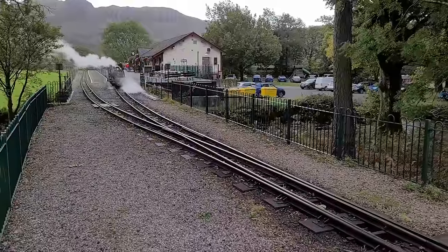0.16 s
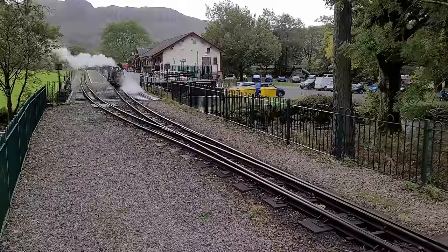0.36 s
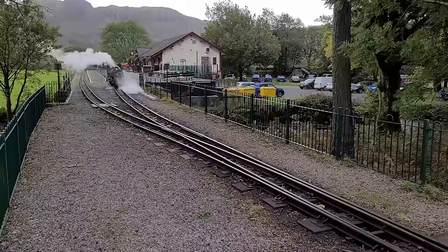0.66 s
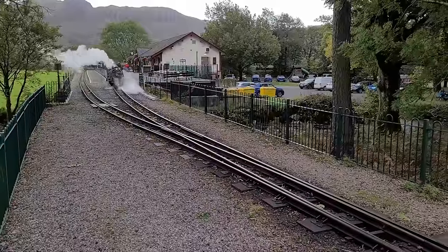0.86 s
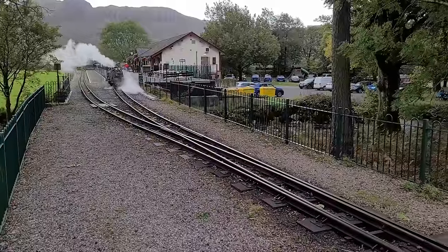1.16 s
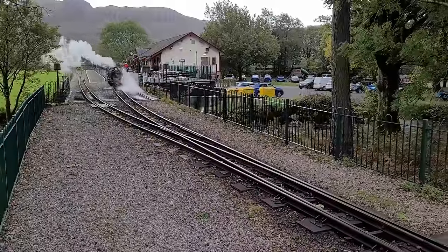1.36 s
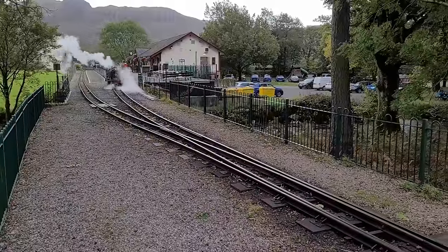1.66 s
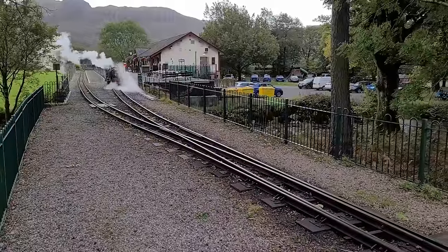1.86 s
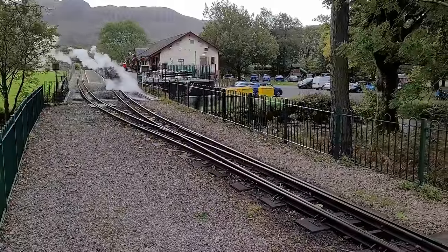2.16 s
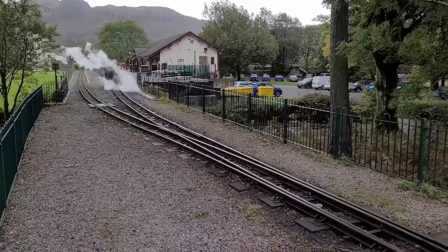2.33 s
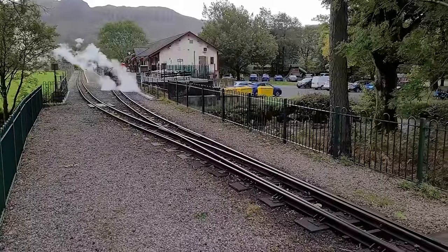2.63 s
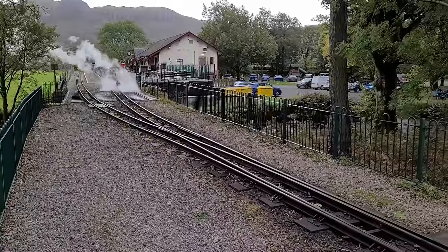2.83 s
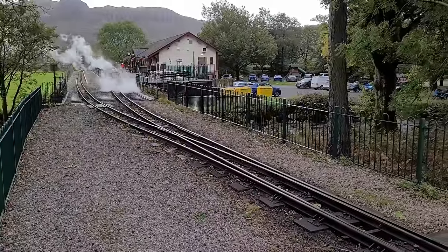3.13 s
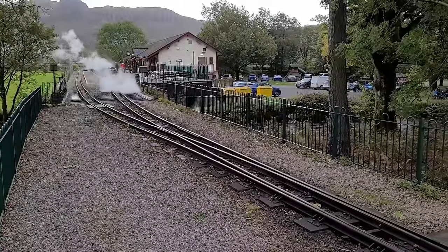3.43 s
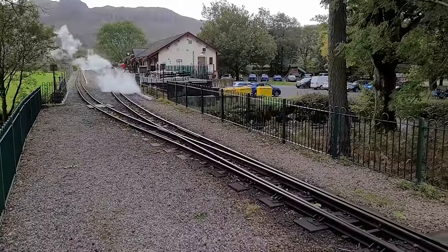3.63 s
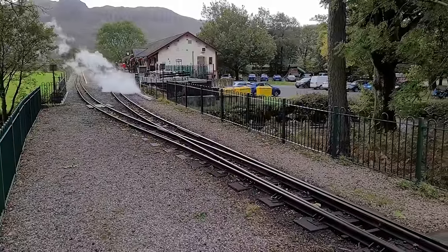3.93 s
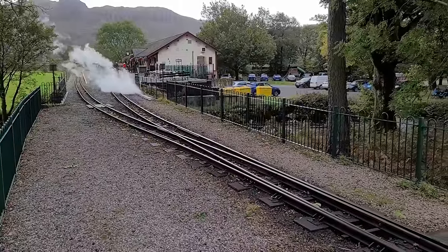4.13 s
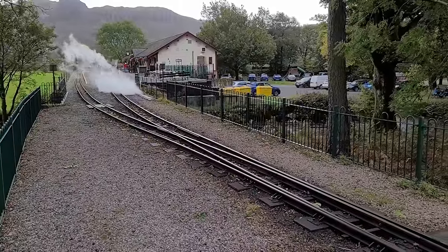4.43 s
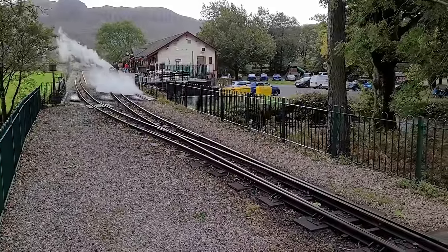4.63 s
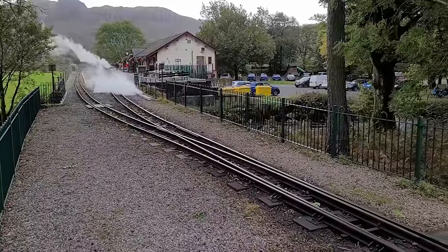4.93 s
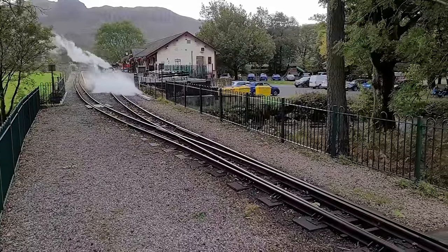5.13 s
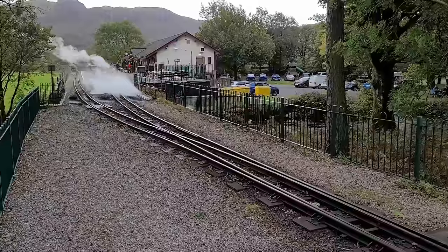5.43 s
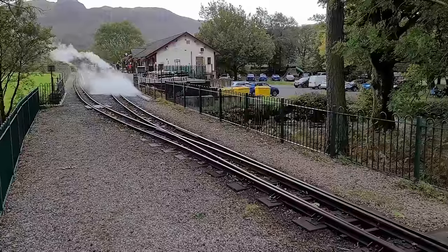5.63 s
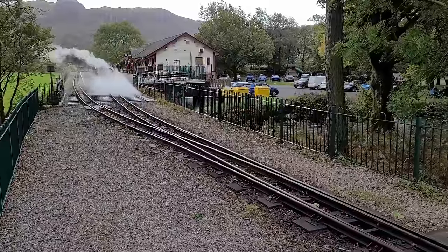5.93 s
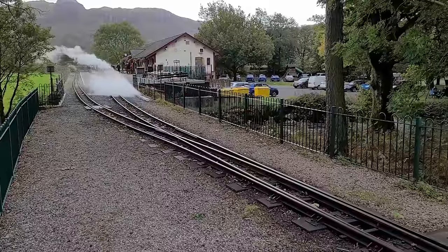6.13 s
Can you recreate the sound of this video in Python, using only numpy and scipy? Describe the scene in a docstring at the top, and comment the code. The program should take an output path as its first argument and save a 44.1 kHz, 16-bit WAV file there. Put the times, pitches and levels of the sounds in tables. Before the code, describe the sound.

Steam jets from a small locomotive, swelling from faint sputtering to a bright continuous roar, with low buffeting breeze over the open-air microphone.

```python
"""A miniature steam locomotive some way off at a country station blows steam from its open cylinder cocks.
The hiss is resonant jet noise that builds in steps, surges brightly, then spreads into a wide, steady rush.
Below it the plume roars as low-passed jet noise and the engine's hollow parts ring as resonant noise.
Delayed copies of the jet noise give it a fine, slowly moving comb colour. A breeze of lumpy low noise buffets
both microphone ports, single eddies strike as short pressure swings, and faint outdoor air lies beneath."""
import sys
import numpy as np
from scipy import signal
from scipy.fft import rfft, irfft, next_fast_len
from scipy.io import wavfile
from scipy.ndimage import map_coordinates

SR = 44100
rng = np.random.default_rng(int(sys.argv[2]) if len(sys.argv) > 2 else 0)


def waveform_to_disk(signal):
    """Save audio, clipped to [-1, 1], as 16-bit WAV at the path in sys.argv[1]."""
    frames = np.transpose(np.atleast_2d(signal))
    scaled = np.clip(frames, -1, 1) * 32767
    samples = np.round(scaled).astype(np.int16)
    wavfile.write(sys.argv[1], SR, samples)


N = 276948

# Steam flow through the cocks, opened in steps. Each row: time in seconds, hiss level in dB before trim.
STEAM_FLOW = [(0, -56.5), (.14, -50.5), (.42, -49.5), (.88, -45.5), (1.03, -47.5), (1.36, -45.5),
              (1.42, -43.5), (1.53, -41), (1.75, -39.5), (2.0, -40), (2.16, -41.5), (2.46, -37.5),
              (2.52, -41), (2.69, -39), (2.78, -37), (2.9, -34), (2.98, -36), (3.1, -32), (3.26, -35),
              (3.7, -35), (4.9, -35.5), (6.28, -34)]
# Brief dips of the steam. Each row: time in seconds, change at the deepest point in dB.
FLOW_DIPS = [(1.13, -3.5), (5.465, -3)]
# Hiss of the cocks before its low cut. Each row: frequency in Hz, relative density in dB per Hz.
JET_SPECTRUM = [(1100, -12), (2500, -2), (3300, -3), (4600, -2.5), (6400, 2), (7100, -0.5), (7700, 1.5),
                (9100, -5), (10300, -4.5), (10900, -12), (11600, -7), (13200, -8), (14700, -4),
                (15700, -10.5)]
# Narrow resonances and notches of the jet, before sway, wander and blur.
# Each row: centre in Hz, width in Hz, gain in dB.
JET_MODES = [(2460, 140, 6), (3003, 39, 12), (3450, 710, 2.5), (4290, 250, 6.5), (4650, 180, 4),
             (4945, 130, 6), (5260, 310, 2), (5670, 160, 4.5), (6140, 98, 2.5), (6785, 41, 11.5),
             (7280, 77, 8.5), (7790, 1120, -9), (8670, 110, 4.5), (9900, 120, 1.5), (10430, 270, 1),
             (13900, 350, -5), (15200, 300, -3)]
# Bright spurts of the jet. Each row: time of the peak in seconds, half length in seconds,
# lift below 4 kHz in dB, lift around 6 kHz in dB, lift around 10 kHz in dB, lift above 12 kHz in dB.
JET_SPURTS = [(0.033, 0.075, -3, 1, 9, 5), (0.612, 0.09, -0.5, 1, 2.5, 2.5), (0.82, 0.083, 2, 0.5, -1, -1),
              (1.26, 0.12, -1, -2, 2.5, 2), (1.584, 0.064, 3, 1, 5, 6), (1.83, 0.093, 4, -1, -0.5, 2),
              (2.075, 0.1, 3, 1.5, 7.5, 8), (2.173, 0.036, 3, 3.5, -2, 0), (2.317, 0.11, 1, 1, 4, 6),
              (2.97, 0.45, -0.7, -1.5, 2.1, 5), (3.004, 0.062, 1.5, 4.5, 0, 3.5),
              (3.16, 0.072, 1, -1, 5.5, 6), (3.35, 0.075, 3.5, 0.5, -0.5, 5.5),
              (3.47, 0.045, 3.5, -1, 2, -2)]
# Delayed copies of the direct sound. Each row: mean delay in ms, gain.
DELAYED_COPIES = [(1.72, 0.056), (4.7, 0.044), (8.3, 0.47), (13.0, 0.16), (21.5, 0.16)]
# Resonances that colour the direct sound and its copies. Each row: centre in Hz, width in Hz, gain in dB.
DIRECT_MODES = [(2050, 280, 3.5), (3880, 900, 7.5), (6040, 250, 0), (6400, 120, 6), (10580, 390, 10),
                (11000, 410, 13), (12600, 250, 5)]
# Phase by which the direct sound leads at the left port. Each row: frequency in Hz, lead in radians.
LEFT_LEAD = [(750, 0), (1000, 2.5), (1600, 2.2), (2500, 12.5), (2950, 15.2), (4100, 15.7), (4650, 16.6),
             (5250, 21.6), (6400, 22.2), (6770, 25), (8300, 24.6), (12500, 28.2), (13600, 30),
             (15300, 37.7)]
# Roar of the plume. Each row: frequency in Hz, relative density in dB per Hz.
ROAR_SPECTRUM = [(100, -1), (200, -4.5), (330, 7), (440, 1.5), (700, 1.5), (860, -0.5), (1120, -2.5),
                 (1500, 6), (1750, 1.5), (2050, 5.5), (2600, 1.5), (3400, -2.5), (6000, -43)]
# Hollow resonances of chimney and boiler. Each row: centre in Hz, width in Hz, relative gain in dB.
HOLLOW_MODES = [(262, 57, 11.5), (484, 260, -6.5), (616, 166, 2.5)]
# Rising and falling breeze at the ports. Each row: time in seconds, level in dB before waver and trim.
BREEZE_LEVEL = [(0, -41), (.3, -41), (.43, -47.5), (.6, -46.5), (1.1, -39.5), (1.31, -49.5), (1.6, -40.5),
                (2.2, -39.5), (2.62, -43.5), (3.0, -49.5), (3.5, -53.5), (3.62, -43), (3.84, -42),
                (4.0, -59), (4.2, -41), (4.33, -42), (4.55, -42.5), (5.0, -48), (5.09, -50), (5.22, -41),
                (5.6, -43.5), (6.28, -51)]
# Gusts. Each row: start in seconds, length in seconds, level in dB before trim, left minus right in dB.
WIND_GUSTS = [(0.687, 0.19, -46.5, -10), (1.38, 0.14, -41, 6), (1.646, 0.14, -35.5, 4),
              (1.964, 0.06, -35.5, 7), (2.06, 0.25, -40, -5), (2.367, 0.036, -38, 17),
              (3.57, 0.052, -39.5, 11), (3.7, 0.059, -40.5, 5), (4.234, 0.084, -37.5, -7),
              (5.335, 0.046, -41, 14), (5.562, 0.08, -39, 1), (5.84, 0.13, -39.5, -2)]
# Spectrum of the breeze. Each row: frequency in Hz, relative density in dB per Hz.
RUMBLE_SPECTRUM = [(15, -1.5), (38, -14), (56, 3.5), (95, -2), (130, 0.5), (190, -10.5), (270, -12.5),
                   (400, -25.5), (700, -33), (1500, -66), (4000, -74)]
# Flutter that grows in stronger gusts. Each row: frequency in Hz, relative density in dB per Hz.
FLUTTER_SPECTRUM = [(40, -15), (130, -2), (280, 4.5), (400, -4.5), (750, -13), (1500, -33), (4000, -60)]
# Still outdoor air. Each row: frequency in Hz, relative density in dB per Hz.
AIR_SPECTRUM = [(200, 5.5), (900, -1), (2000, -5.5), (6000, -8.5), (15000, -10)]
# Single eddies that hit the ports. Each row: start in seconds, peak in dB before trim and panning,
# pitch of the swing in Hz, left minus right in dB, churn as a ratio to the swing.
PORT_EDDIES = [(0.048, -13.5, 300, 4, 0.7), (0.203, -16, 204, -0.5, 0.73), (0.67, -18.5, 106, 0, 0.73),
               (0.752, -34, 75, -1, 0.44), (1.075, -19, 109, 5, 0.76), (1.121, -19, 336, 0, 0.86),
               (1.2, -18, 190, 8, 0.92), (1.651, -19.5, 90.5, 4, 0.47), (1.725, -25, 241, 0, 1.0),
               (1.865, -20, 110, -9, 0.44), (1.987, -15, 312, -5, 1.0), (2.001, -16.5, 133, 6, 0.46),
               (2.055, -19, 320, -2, 0.6), (2.094, -13.5, 140, -5, 0.46), (2.169, -13.5, 65, 5, 0.35),
               (2.217, -21, 90, 7, 0.4), (2.236, -10, 260, 0, 0.53), (2.24, -12.5, 140, 7, 0.39),
               (2.268, -20, 253, -2, 0.68), (2.279, -13.5, 104, -3, 0.46), (2.379, -23, 138, 3, 0.7),
               (2.405, -15.5, 152, 5, 0.39), (2.466, -22.5, 230, -7, 0.82), (2.546, -25, 210, -3, 0.65),
               (2.757, -22, 111, -1, 0.5), (3.26, -25, 107, 11, 0.61), (3.718, -19, 87, -5, 0.79),
               (4.2, -21, 268, 1, 0.4), (4.219, -17, 203, 0, 0.4), (4.254, -20, 65, 2, 0.3),
               (4.258, -13, 236, -4, 0.4), (4.272, -16, 244, 6, 0.3), (4.286, -17, 275, 0, 0.3),
               (4.303, -18, 168, 2, 0.3), (4.567, -23, 99, -13, 0.4), (5.298, -22, 304, -3, 0.77),
               (5.345, -19, 260, -4, 0.45), (5.36, -18, 198, 1, 0.49), (5.577, -19.5, 133, 7, 0.52),
               (5.608, -24, 246, -4, 0.6), (5.912, -17, 160, -1, 0.64), (6.114, -23.5, 88.5, 1, 0.7)]
# Churn of an eddy. Each row: frequency in Hz, relative density in dB per Hz.
CHURN_SPECTRUM = [(25, 2), (70, -15), (150, 0), (300, 15), (450, -1.5), (750, -10), (1500, -22.5),
                  (4000, -70)]

FULL_FLOW_DB = -34  # table level that counts as wide-open cocks
DIP_HALF_S = 0.031
SPREAD_START_S, SPREAD_TIME_S = 2.97, 1.07  # the cloud spreads along the ground
SCATTER_NARROW, SCATTER_WIDE = 0.51, 0.74  # power share that arrives scattered, 0-1
CALMING = 0.33  # share of the wavering, in dB, that the wide cloud evens out
SHRILL_DB, SHRILL_WIDE_DB = 1.56, 3.5  # lift around 10 kHz; further lift once spread
SIZZLE_DB, SIZZLE_WIDE_DB = -3.5, 3.5  # lift above 12 kHz at full flow; further lift once spread
SIZZLE_GROWS = 0.22  # dB per dB of flow
FLICKER_DB = 0.8  # scale of the brightness flicker, before calming
PEAK_SWAY_DB, PEAK_WANDER_HZ = 1.4, 28  # scale of each resonance's sway in height and wander in pitch
PEAK_BLUR = 0.23  # share of their height in dB that is lost once spread
PLUME_DB, PLUME_GROWS, PLUME_WIDE_DB = -42, 0.63, 0.5  # at full flow; dB per dB of flow; more once spread
DRONE_DB, DRONE_GROWS = -40.5, 0.7  # hollow ring at full flow once spread; dB per dB of flow
DRONE_EARLY_DB = -4.5  # the ring is weaker until the cloud has spread
SIDE_START_DB, SIDE_DB_PER_S = 17, -3  # left minus right: the breeze veers from the left to the front
GUST_ATTACK_S, GUST_RELEASE_S = 0.015, 0.021
AIR_DB = -53
EDDY_CROSSING_S = 0.00096  # lag of the swing's phase at the right port
TOP_HZ = 15820  # upper band limit


def amp(db):
    """Logarithmic level: decibels become an amplitude ratio."""
    return 10 ** (np.asarray(db) / 20)


def unit(x):
    """Normalisation: the mean of the channels is brought to rms 1."""
    return x / np.sqrt(np.mean(np.atleast_2d(x).mean(0) ** 2) + 1e-20)


def along(points, hz):
    """Spectral interpolation: (Hz, value) points are read on a logarithmic frequency axis."""
    f, v = np.transpose(points)
    return np.interp(np.log(hz + 1), np.log(f + 1), v)


def curves(rows):
    """Linear interpolation in time: one value per sample for each column after the time."""
    s, *cols = np.transpose(rows)
    return [np.interp(np.arange(N) / SR, s, c) for c in cols]


def wobble(rate, t=None):
    """Band-limited fluctuation: a smooth random curve, rate knots a second, at every sample or at times t."""
    t = np.arange(N) / SR if t is None else t
    return map_coordinates(rng.standard_normal(1024), [t * rate], mode="wrap")


def swell(s, half_length):
    """Gaussian envelope: a smooth rise and fall, 1 at time s."""
    return np.exp(-((np.arange(N) / SR - s) / half_length) ** 2)


def bell(hz, centre, width):
    """Lorentzian resonance: 1 at its centre, one half at half the width to either side."""
    return 1 / (1 + (2 * (hz - centre) / width) ** 2)


def filtered(x, response):
    """Linear filtering: the spectrum of x times a complex response of frequency."""
    size = x.shape[-1]
    m = next_fast_len(size + 8192)
    return irfft(rfft(x, m) * response(np.fft.rfftfreq(m, 1 / SR)), m)[..., :size]


def coloured(x, spectrum):
    """Spectral shaping: x takes on the densities of a (Hz, dB) table."""
    return filtered(x, lambda hz: amp(along(spectrum, hz)))


def panned(side_db):
    """Constant-power panning: a level difference becomes left and right gains."""
    ports = amp(np.outer([.5, -.5], side_db))
    return ports / np.linalg.norm(ports, axis=0)


def flow():
    """Source strength: steam flow in dB relative to wide-open cocks, with its brief dips."""
    dips_db = sum(db * swell(s, DIP_HALF_S) for s, db in FLOW_DIPS)
    return curves(STEAM_FLOW)[0] - FULL_FLOW_DB + dips_db


def spread():
    """Source extent: how far the cloud has spread along the ground, 0-1."""
    return np.clip((np.arange(N) / SR - SPREAD_START_S) / SPREAD_TIME_S, 0, 1)


def scatter():
    """Loss of coherence: the wider the cloud, the more of its sound arrives scattered."""
    return SCATTER_NARROW + (SCATTER_WIDE - SCATTER_NARROW) * spread()


def turbulence(scattered, drift):
    """Partial coherence: white jet noise combed by delayed copies, plus unrelated noise at each port."""
    source, n = rng.standard_normal(N), np.arange(N)
    direct = source.copy()
    for ms, gain in DELAYED_COPIES:
        # each delay wanders slowly, so the comb colour moves
        delay = ms * SR / 1000 * (1 + drift * wobble(1.6))
        direct += gain * map_coordinates(source, [n - delay], mode="wrap")

    def ports(hz):
        colour = amp(sum(db * bell(hz, centre, width) for centre, width, db in DIRECT_MODES))
        return colour * np.exp(.5j * np.outer([1, -1], along(LEFT_LEAD, hz)))

    direct = filtered(direct, ports)
    share = np.clip(scattered, 0, 1)
    return np.sqrt(1 - share) * direct / direct.std() + np.sqrt(share) * rng.standard_normal((2, N))


def brightness():
    """Spectral tilt of a jet: body and treble flicker and change in spurts; the top also grows with flow."""
    spurts_db = sum(np.outer(lifts_db, swell(s, half_length)) for s, half_length, *lifts_db in JET_SPURTS)
    body_db, sharp_db, shrill_db, sizzle_db = spurts_db
    flicker_db = FLICKER_DB * (1 - CALMING * spread())
    body_db = body_db + 0.6 * flicker_db * wobble(17)
    sharp_db = sharp_db + 0.7 * flicker_db * wobble(20)
    shrill_db = shrill_db + SHRILL_DB + SHRILL_WIDE_DB * spread() + flicker_db * wobble(21)
    sizzle_db = sizzle_db + SIZZLE_DB + SIZZLE_WIDE_DB * spread() + SIZZLE_GROWS * flow()
    sizzle_db = sizzle_db + 0.61 * flicker_db * wobble(22.33)
    return body_db, sharp_db, shrill_db, sizzle_db


def jet_resonances(hz, t):
    """Unsteady resonance: each peak sways in height by itself, and peaks and notches wander in pitch."""
    gain_db = 0
    for centre, width, db in JET_MODES:
        height_db = db + PEAK_SWAY_DB * wobble(6, t) * (db > 0)
        wandering_hz = centre + PEAK_WANDER_HZ * wobble(4, t)
        gain_db = gain_db + height_db * bell(hz[:, None], wandering_hz, width)
    return gain_db


def through_air(x, body_db, sharp_db, shrill_db, sizzle_db, patchy_db):
    """Time-varying filtering: bands and resonances are lifted while narrow spectral patches swell and fade."""
    hz, t, z = signal.stft(x, SR, nperseg=1024)
    # random gains smoothed over 5 frequency bins and 14 frames
    smoothing = np.outer(np.hanning(5), np.hanning(14))
    field = signal.fftconvolve(rng.standard_normal(z.shape[1:]), smoothing, "same")

    def frames(curve):
        return np.interp(t, np.arange(N) / SR, curve)

    def band(points, lift_db):
        return np.outer(along(points, hz), frames(lift_db))

    gain_db = band([(3500, 1), (4800, 0)], body_db)
    gain_db += band([(3500, 0), (4800, 1), (7500, 1), (10200, 0)], sharp_db)
    gain_db += band([(7500, 0), (10200, 1), (11000, 1), (12000, 0)], shrill_db)
    gain_db += band([(10800, 0), (12000, 1)], sizzle_db)
    gain_db += jet_resonances(hz, t) * frames(1 - PEAK_BLUR * spread())
    gain_db += patchy_db * frames(1 - CALMING * spread()) * field / field.std()
    return signal.istft(z * amp(gain_db), SR, nperseg=1024)[1][:, :N]


def cocks():
    """Jet noise: steam from the cocks is louder and brighter with harder flow, and water makes it sputter."""
    jet = filtered(turbulence(scatter(), drift=0.0073),
                   lambda hz: amp(along(JET_SPECTRUM, hz)) * hz ** 3 / (hz ** 3 + 2500 ** 3))
    sputter = amp((0.25 * wobble(22) + 0.9 * wobble(110)) * (1 - CALMING * spread()))
    hiss = through_air(unit(jet), *brightness(), patchy_db=2.5)
    hiss = hiss * sputter * amp(FULL_FLOW_DB + flow() + 2.2)
    # left minus right in dB: the left port hears the upper treble a little more strongly
    side = [(4500, 1.3), (6400, -0.8), (11500, 2.0), (14000, 1.0)]
    return filtered(hiss, lambda hz: amp(np.outer([.5, -.5], along(side, hz))))


def plume():
    """Large-scale mixing noise: the slower, wider part of the jet roars, following the flow."""
    roar = coloured(turbulence(0.73 * scatter(), drift=0.018), ROAR_SPECTRUM)
    level_db = PLUME_DB + PLUME_GROWS * flow() + PLUME_WIDE_DB * spread() + 1.1 * wobble(22.05)
    return unit(roar) * amp(level_db)


def engine(apart=0.41):
    """Cavity resonance: rushing steam rings the engine's hollow parts, nearly alike at both ports."""
    def ring(hz):
        return sum(amp(db) * bell(hz, centre, width) for centre, width, db in HOLLOW_MODES)

    drone = filtered(rng.standard_normal(N) + apart * rng.standard_normal((2, N)), ring)
    level_db = DRONE_DB + DRONE_GROWS * flow() + DRONE_EARLY_DB * (1 - spread()) + 1.94 * wobble(14)
    return unit(drone) * amp(level_db)


def wind_strength():
    """Addition of powers: a wavering breeze at each port plus gusts that rise, hold and die away."""
    t = np.arange(N) / SR
    level_db = curves(BREEZE_LEVEL)[0] + 1.5 * wobble(18)
    side_db = SIDE_START_DB + SIDE_DB_PER_S * t + 1.2 * wobble(7.6)
    power = (amp(level_db) * panned(side_db)) ** 2
    for s, length, db, gust_side_db in WIND_GUSTS:
        corners = [s - GUST_ATTACK_S, s, s + length - GUST_RELEASE_S / 2, s + length + GUST_RELEASE_S]
        shape = np.interp(t, corners, [0, 1, 1, 0])
        power = power + (amp(db) * shape * panned(gust_side_db)) ** 2
    return np.sqrt(power)


def breeze(steepness=1.206):
    """Wind pressure noise: lumpy rumble, unrelated at the ports; stronger gusts add a higher flutter."""
    strength = wind_strength()
    lumps = amp(5.3 * np.tanh([wobble(45), wobble(45)]))

    def wind(spectrum):
        return unit(lumps * coloured(rng.standard_normal((2, N)), spectrum))

    rumble = wind(RUMBLE_SPECTRUM) * strength * amp(4.5)
    flutter = wind(FLUTTER_SPECTRUM) * strength ** steepness * amp(6.0)
    return rumble + flutter


def outdoors():
    """Diffuse background: a faint, even hush of trees and distance, unrelated at the ports."""
    return unit(coloured(rng.standard_normal((2, N)), AIR_SPECTRUM)) * amp(AIR_DB)


def eddies():
    """Vortex passage: each eddy swings the pressure for a cycle or two, later in phase at the right, and churns."""
    out, t = np.zeros((2, N + SR)), np.arange(SR // 8) / SR
    age = t / 0.005  # the churn peaks 5 ms after the start
    lag_s = np.array([[0], [EDDY_CROSSING_S]])
    for s, db, swing_hz, pan_db, churn in PORT_EDDIES:
        wake = coloured(rng.standard_normal((2, len(t))), CHURN_SPECTRUM) * age * np.exp(-age)
        cycles = swing_hz * t
        phase = 2 * np.pi * (cycles + rng.random() - swing_hz * lag_s)
        # a smooth window 2.17 cycles long
        swing = np.sin(phase) * np.sin(np.pi * np.minimum(cycles / 2.17, 1)) ** 2
        puff = swing + churn * wake / np.abs(wake).max(1, keepdims=True)
        out[:, round(s * SR):][:, :len(t)] += puff * panned(pan_db) * amp(db - 3.0)
    return out[:, :N]


def scene():
    """Superposition: distant steam behind close wind."""
    return cocks() + plume() + engine() + breeze() + outdoors() + eddies()


def record(dry):
    """Band limitation: nothing at or above the band limit passes."""
    return filtered(dry, lambda hz: hz < TOP_HZ)


dry = scene()
out = record(dry)
waveform_to_disk(out)
```